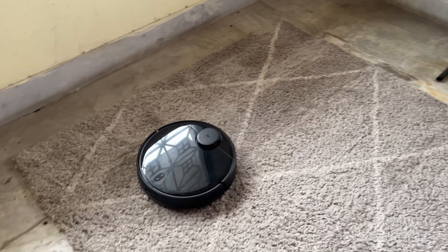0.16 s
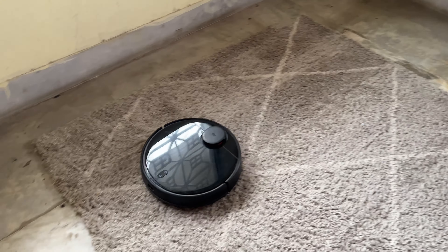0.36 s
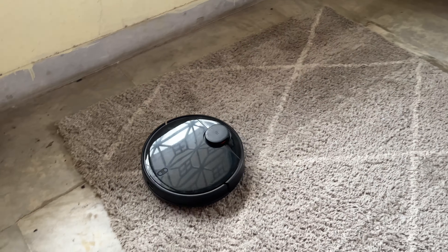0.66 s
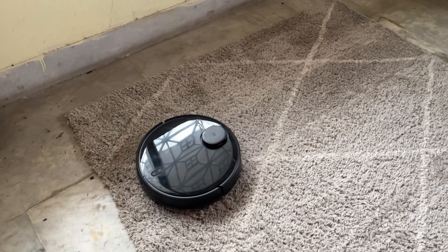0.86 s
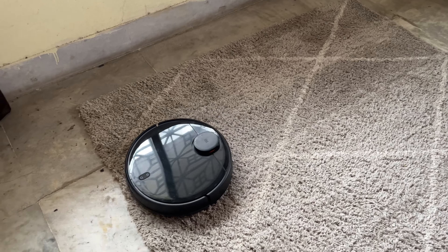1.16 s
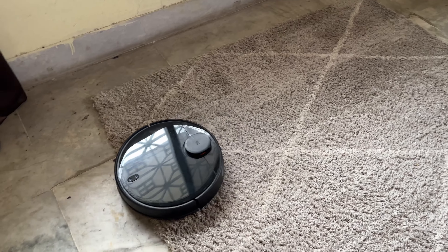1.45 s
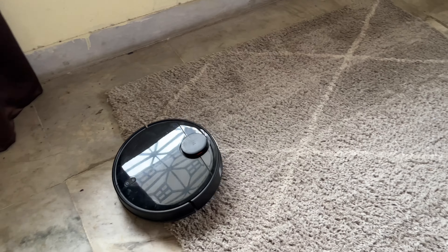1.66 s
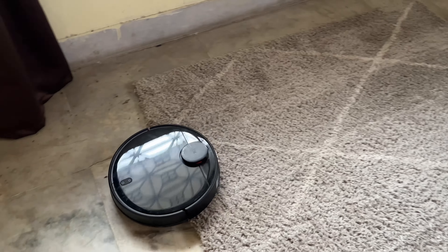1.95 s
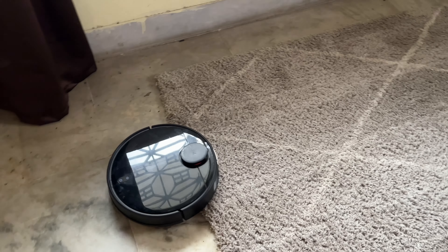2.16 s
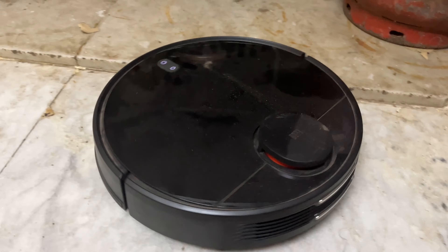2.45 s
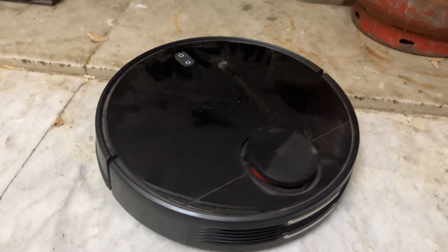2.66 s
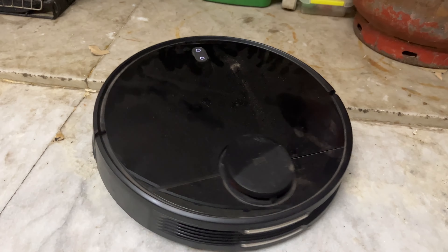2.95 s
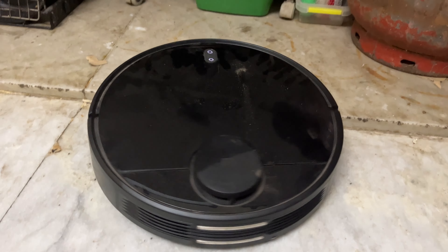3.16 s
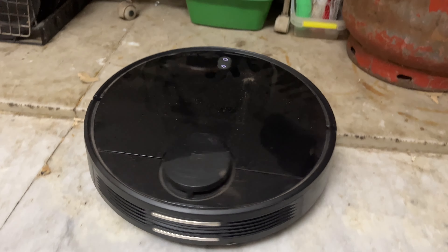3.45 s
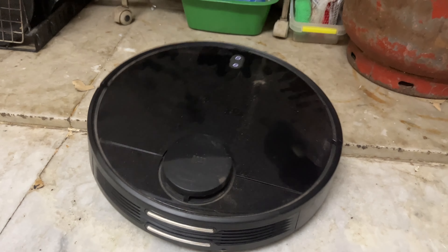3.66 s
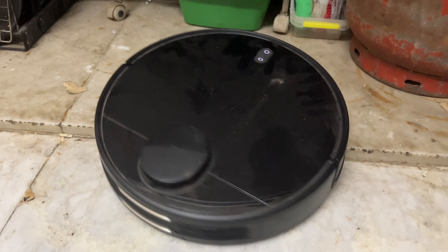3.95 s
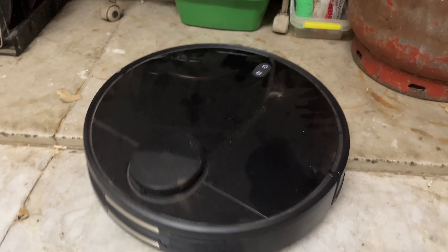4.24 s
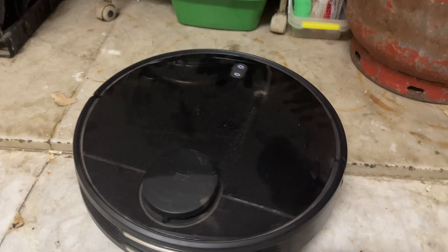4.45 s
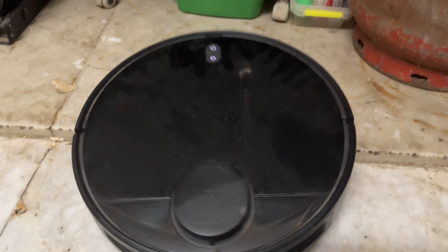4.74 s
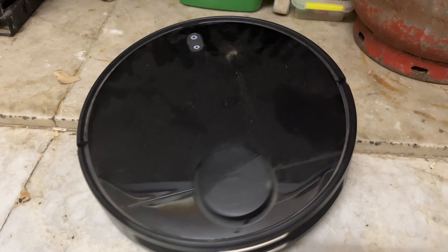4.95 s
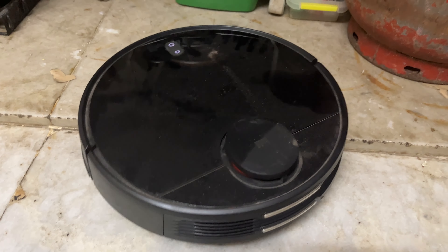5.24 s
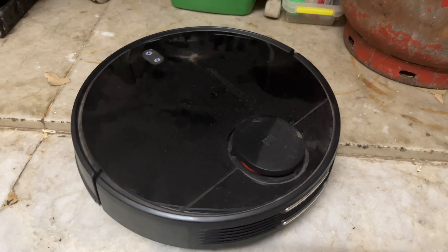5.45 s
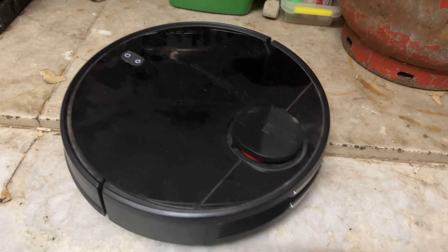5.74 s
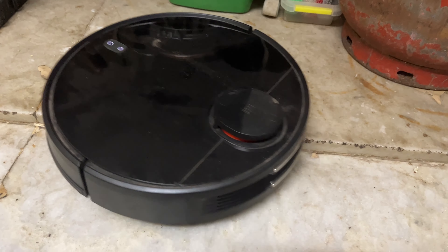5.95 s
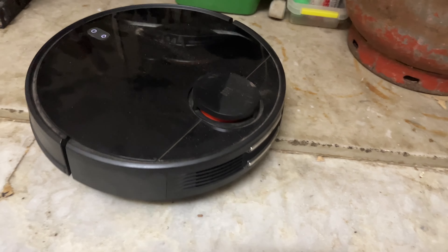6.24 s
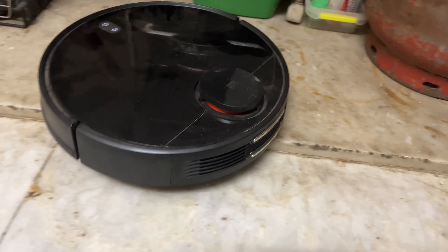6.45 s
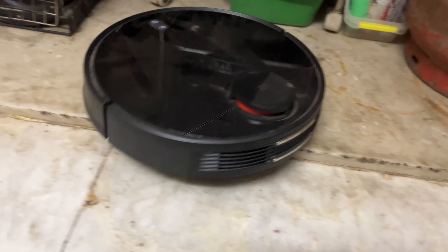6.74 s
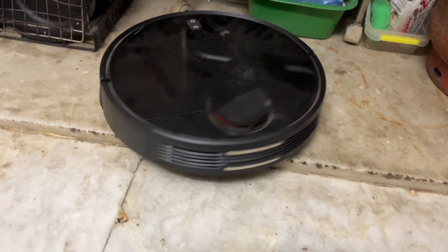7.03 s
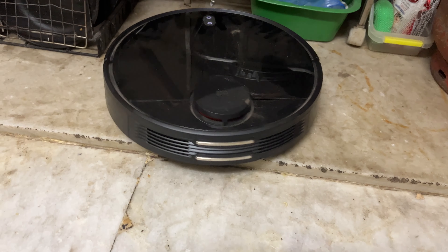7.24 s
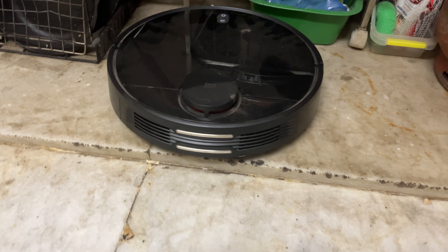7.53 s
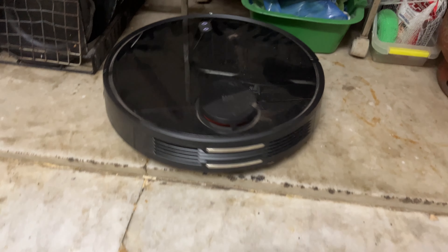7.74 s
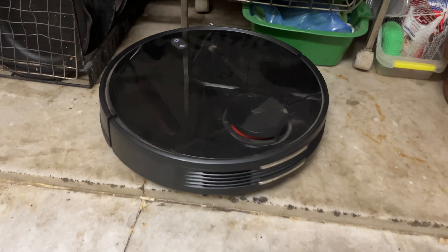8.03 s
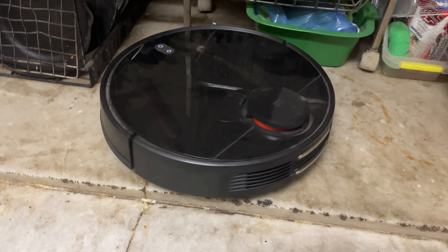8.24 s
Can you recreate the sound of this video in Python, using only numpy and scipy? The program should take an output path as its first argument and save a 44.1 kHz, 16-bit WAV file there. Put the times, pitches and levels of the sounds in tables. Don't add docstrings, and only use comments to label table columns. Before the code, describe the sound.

From 0 to 2.4 seconds a robot vacuum runs on carpet some distance away: steady rushing air, a low fan hum near 210 Hz and a nasal gear whine around 1 kHz that sags and breaks repeatedly as tufts catch the wheels. Faint shell clicks come near 1.6 to 1.9 and 2.3. At 2.4 the view cuts abruptly to the machine close by on tile: louder, hissier air, a thin very high whine and motor tones that swell and fade, strongest around 4.3. Hollow plastic knocks hit at 2.8 and 3.3, a sharp hard clatter at 3.95 to 4.1, then clacks at 4.75 and 5.1, with brief rattles, dull scuffs and short room echo. It runs mostly steadily until another cluster at 6.7 to 7.1. From about 7.4 to the end at 8.4, deep floor booms swell under the slightly softer motor and air.

```python
import sys
import numpy as np
from scipy import signal
from scipy.fft import rfft, irfft, next_fast_len
from scipy.io import wavfile
from scipy.ndimage import uniform_filter1d

SR = 44100
rng = np.random.default_rng(int(sys.argv[2]) if len(sys.argv) > 2 else 0)


def dump_mix(stems):
    frames = np.atleast_2d(stems).T
    limited = np.clip(frames, -1, 1)
    pcm = np.round(limited * 32767).astype(np.int16)
    wavfile.write(sys.argv[1], SR, pcm)


def boost_factor(decibels):
    exponent = np.asarray(decibels, float) / 20
    return 10 ** exponent


N = 369116
T = np.arange(N) / SR
T_SLOW = T[::64]
CUT_S = 2.402


def evened(x):
    return x / np.sqrt(np.mean(x ** 2) + 1e-20)


def read(points, hz):
    f, value = np.transpose(points)
    return np.interp(np.log(hz + 1), np.log(f + 1), value)


def curves(rows, t=T):
    s, *columns = np.transpose(rows)
    return [np.interp(t, s, c) for c in columns]


def drift(top_hz):
    slow = 0
    for f in np.geomspace(top_hz / 20, top_hz, num=16):
        slow = slow + np.sin(2 * np.pi * (f * T_SLOW + rng.random())) / np.sqrt(f)
    return np.interp(T, T_SLOW, evened(slow))


def tone(hz, db):
    return np.sqrt(2) * boost_factor(db) * np.exp(2j * np.pi * (np.cumsum(hz) / SR + rng.random()))


def left_right(mid, side):
    return np.array([mid + side, mid - side]).real


def summed(rest_db, shapes, dbs):
    power = boost_factor(rest_db) ** 2
    for shape, db in zip(shapes, dbs):
        power = power + (boost_factor(db) * shape) ** 2
    return 10 * np.log10(power)


# f/Hz, density/(dB per Hz)
FAR_MID = [(24, -53), (40, -16), (211, -1.5), (263, -8.5), (432, -9.5), (746, -18), (1030, -15),
           (1570, -26.5), (2390, -22), (6620, -30.5), (7310, -32), (8070, -55.5), (9840, -44), (13300, -45),
           (15000, -55)]
FAR_SIDE = [(24, -50), (40, -35), (211, -5), (888, -8.5), (1030, 1), (1170, -15), (1740, -20),
            (2340, -14.5), (7320, -21), (9850, -32), (11400, -63), (12600, -37), (15000, -34)]
NEAR_MID = [(30, -56), (45, 0.5), (160, -4.5), (950, -10.5), (1390, -13.5), (1570, -17.5), (2300, -16),
            (3830, -19), (7200, -24.5), (8300, -46), (9200, -36.5), (10000, -31), (12700, -32),
            (13400, -33), (14800, -48)]
NEAR_SIDE = [(30, -36), (86, -6), (157, -15), (338, -15.5), (693, -8.5), (1420, -11.5), (1870, -16.5),
             (8280, -20.5), (10300, -31), (10900, -27), (11700, -65), (13300, -36), (15600, -24)]
# f/Hz, width/Hz, level/dB
DUCT = [(300, 15, 5), (357, 38, 5), (419.4, 43, 7), (494, 23, 6.5), (1050, 310, 5), (2347, 300, 4),
        (2440, 170, 1), (3300, 170, 3), (3840, 730, 4)]
# t/s, loudness/dB, exhaust facing/0-1
POSE = [(0, -1.5, 0.4), (.74, 0, 0.46), (1.54, -1, 0.61), (1.88, 2, 0.48), (2.39, 1, 0.77),
        (2.41, 0.5, 0.1), (2.61, 1, 0.16), (2.96, 0.5, 0.32), (3.5, 1.5, 0), (3.75, -1, 0.42),
        (4.2, -0.5, 0.81), (4.95, 0, 0.6), (5.4, -1, 0.33), (6.31, 0, 0.52), (6.91, 0, 0.11), (7.45, -2, 1),
        (8.37, -2.5, 0.19)]
# far level/dB, near level/dB, share of loudness/1, gain when exhaust faces phone/dB
LAYERS = [
    (-47, -41, 0.99, -1),
    (-59.5, -50, 0.56, 5),
    (-59.5, -49.5, 1, 6),
    (-73.5, -62, 0.19, 5),
]
# t/s, length/s, level/dB
GRIT = [
    (3.476, 0.24, 4.5),
    (7.445, 0.3, 0),
]


def air_levels(hz, t):
    duct_db = sum(db / (1 + (2 * (hz - f) / w) ** 2) for f, w, db in DUCT)
    loud_db, facing = curves(POSE, t)
    far_db, near_db, share, faced_db = np.transpose(LAYERS)[:, :, None]
    swell_db = sum(db * np.exp(-((t - s) / length) ** 2) for s, length, db in GRIT)
    grit_db = np.outer(np.arange(len(LAYERS)) == 2, swell_db)
    edges_hz = np.array([[250, 1300], [1500, 2700], [2900, 7000], [9600, 14000]])
    place = np.interp(np.log(hz + 1), np.log(edges_hz.ravel()), [0, 0, 1, 1, 2, 2, 3, 3])
    weights = np.maximum(1 - abs(place[:, None] - np.arange(len(edges_hz))), 0)
    views = [(far_db, FAR_MID, FAR_SIDE, -10.5, t < CUT_S),
             (near_db, NEAR_MID, NEAR_SIDE, -4, t >= CUT_S)]
    out = 0
    for base_db, mid, side, side_db, on in views:
        mid_db = read(mid, hz) + duct_db
        both_db = np.array([mid_db, read(side, hz) + duct_db + side_db])[:, :, None]
        band_power = [np.sum(boost_factor(mid_db[(hz > lo) & (hz < hi)]) ** 2) for lo, hi in edges_hz]
        band_db = 10 * np.log10(band_power)
        layer_db = base_db + share * loud_db + faced_db * facing + grit_db - band_db[:, None]
        out = out + on * boost_factor(weights @ layer_db + both_db)
    return out


# f/Hz, share of sum in difference/1
LEAN = [(100, .05), (400, 0.09), (700, 0.34), (1400, 0.25), (2000, 0.063), (2800, .15), (5000, 0.41),
        (6800, .06), (9000, 0.01)]


def air(patchy_db=1.24, whistle_db=3.0):
    frames, hz = N // 256 + 5, np.fft.rfftfreq(1024, 1 / SR)
    t = np.arange(frames) * 256 / SR
    a, b, c, d, patches, whistles = rng.standard_normal((frames, 513, 6)).T
    patches = uniform_filter1d(patches, size=8, axis=0)
    patches = evened(uniform_filter1d(patches, size=12, axis=1))
    whistles = evened(uniform_filter1d(whistles, size=70, axis=1))
    lean = np.clip(read(LEAN, hz), -1, 1)[:, None]
    total = a + 1j * b
    z = np.array([total, lean * total + np.sqrt(1 - lean ** 2) * (c + 1j * d)])
    patch_depth_db = patchy_db * (1 + 2.0 * (hz > 12900)[:, None])
    z *= air_levels(hz, t) * boost_factor(patch_depth_db * patches + whistle_db * whistles + 0.5)
    return left_right(*signal.istft(z, nperseg=1024, noverlap=768)[1][:, :N])


# t/s, f/Hz, level/dB
FAN = [(0, 209.6, -50), (1.5, 214, -46.5), (2.39, 211.9, -49), (2.41, 213.5, -45.5), (4, 211, -48.5),
       (6, 212.5, -48), (8.37, 211.6, -53.5)]
# t/s, f/Hz, level/dB
FAN_TOP = [(0, 13570, -83), (2.39, 13570, -83), (2.41, 13690, -67), (3.7, 13695, -67), (4.1, 13645, -67),
           (8.37, 13665, -66)]


def fan():
    hz, db = curves(FAN)
    shaft = tone(hz + 1.88 * drift(12), db + 0.5 * drift(22.8))
    hz, db = curves(FAN_TOP)
    blades = tone(hz + 9 * drift(8), db + 3.0 * drift(12))
    return left_right(shaft + blades, 0.021 * shaft + .6j * blades)


# multiple/1, middle t/s, length/s, level/dB
BEAMS = [(4, 1.7, 4.1, -58), (4, 2.67, 0.42, -57), (4, 3.43, 0.49, -50.5), (4, 4.4, 0.81, -47),
         (4, 5.78, 0.73, -54), (4, 8.1, 0.82, -58), (4, 7.6, 0.82, -78.5), (6, 1.23, .4, -65),
         (6, 3.4, 0.74, -50), (6, 5, 1.5, -54), (6, 6.19, 0.52, -55), (6, 7.06, 0.98, -52),
         (9, 2.9, 6.9, -62.5), (9, 3.6, 0.39, -53), (9, 4.65, 0.33, -56), (9, 6.16, 0.42, -52),
         (9, 6.93, 0.11, -51), (9, 8.0, 0.38, -56), (18, 1.9, .6, -74), (18, 2.995, 0.75, -56.5),
         (18, 3.52, 0.4, -55.5), (18, 4.35, .6, -64), (18, 5.2, 0.44, -61), (18, 5.9, .4, -62),
         (18, 7.35, 1.26, -55), (2.5, 4.4, .8, -55), (2.5, 5.84, 0.87, -53.5)]


def beam(order):
    rows = [row for row in BEAMS if row[0] == order]
    shapes = [np.exp(-4 * ((T_SLOW - s) / length) ** 2) for _, s, length, _ in rows]
    off_beam_db = -70.5
    return np.interp(T, T_SLOW, summed(off_beam_db, shapes, [db for *_, db in rows]))


# t/s, commutator f/Hz, second-order level/dB
BRUSH = [(0, 716, -80), (.9, 716, -72.5), (1.9, 716.5, -56.5), (2.39, 716.5, -54.5), (2.41, 702, -60.5),
         (3.2, 700, -50.5), (3.9, 699.5, -55.5), (4.1, 704, -47.5), (4.3, 705.5, -40), (4.66, 706, -50.5),
         (5.1, 706.5, -63), (5.6, 706, -51.5), (6.2, 704.5, -55), (6.75, 701.5, -47.5), (7.05, 698, -50),
         (7.25, 703.5, -61), (7.65, 704.5, -47), (8.37, 702, -59.5)]
# multiple/1, far sum/dB, far difference/dB, near sum/dB, near difference/dB
ORDERS_DB = [(.5, -64, -75, -58, -68), (2.5, -80, -80, -64, -67), (10, -72, -71, -80, -76),
             (15, -90, -95, -76, -90), (17, -92, -95, -75, -95), (20, -83, -83, -71, -74)]
# multiple/1, difference against sum/dB
STRONG_SIDE = [(4, -3.5), (6, -12), (9, -4), (18, -7), (2.5, -18)]


def brush():
    far = T < CUT_S
    hz, db = curves(BRUSH)
    hz = hz * (1 + 0.000583 * drift(8))
    mid = tone(2 * hz, db + 0.7 * drift(15))
    side = tone(2 * hz, np.where(far, -62., -48.) + 4.5 * drift(6))
    for k, far_db, far_side_db, near_db, near_side_db in ORDERS_DB:
        mid = mid + tone(k * hz, np.where(far, far_db, near_db) + 3.0 * drift(10))
        side = side + tone(k * hz, np.where(far, far_side_db, near_side_db) + 6.7 * drift(5))
    for k, side_db in STRONG_SIDE:
        db = beam(k)
        mid = mid + tone(k * hz + 6 * drift(40), db - 3.0 + 2.2 * drift(70))
        side = side + tone(k * hz, db - 5.0 + side_db + 2.6 * drift(5))
    return left_right(mid, side)


# t/s, f/Hz, level/dB
GEARS = [(0, 1055, -52), (.12, 1070, -40.5), (.3, 1068, -48), (.7, 1059, -45.5), (1.1, 1039, -49.5),
         (1.43, 985, -51), (1.78, 1023, -50.5), (2.1, 1004, -54), (2.39, 901, -55.5)]
# t/s, speed lost/Hz, whine lost/dB, slip/s
SNAGS = [(.13, 11, 13, 0.035), (.205, 62, 16, 0.017), (.26, 1, 12, 0.0091), (.385, 20.5, 8, 0.03),
         (0.411, 39, 7, 0.022), (.455, 1.5, 10, 0.013), (.59, 0.5, 2, 0.0088), (.76, 1, 8, 0.032),
         (.79, 0, 16, 0.0083), (.915, 19.5, 7, 0.018), (1.015, -0.5, 7, 0.014), (1.135, 30, 7, 0.011),
         (1.175, -0.5, 0, 0.0089), (1.33, 1.5, 11, 0.052), (1.49, -0.5, 14, 0.015), (1.54, 1.5, 16, 0.021),
         (1.61, 1.5, 14, 0.032), (1.68, 0, 13, .012), (1.722, -1, 15, .012), (1.82, 3, 14, 0.015),
         (1.92, 2, 22, 0.075), (2.0, 40, 2, .01), (2.05, 2, 12, 0.018), (2.19, -1, 10, 0.027),
         (2.335, -7, 13.5, 0.013)]


def wheels():
    snag_s, regain_s = .025, .07
    hz, db = curves(GEARS, T_SLOW)
    s, sag_hz, lost_db, slip_s = np.transpose(SNAGS)
    since = T_SLOW[:, None] - s
    caught = np.clip(since / snag_s + 1, 0, 1)
    slowed = caught * np.exp(-(np.maximum(since, 0) / regain_s) ** 2)
    hz = hz - slowed @ sag_hz
    db = db - np.exp(-(since / slip_s) ** 2) @ lost_db
    return np.interp(T, T_SLOW, hz), np.interp(T, T_SLOW, db)


def gears():
    hz, db = wheels()
    whine = tone(hz + 3 * drift(150), db + 2.6 * drift(300)) * (T < CUT_S)
    return left_right(whine, (0.047 + .45j) * whine)


# start t/s, length/s, room mode level/dB, rumble level/dB, rumble f/Hz
SWELLS = [(0.221, 0.057, -60, -60, 104.6), (1.6, 0.091, -57, -67, 90), (1.917, 0.36, -51.5, -57.5, 84.6),
          (2.447, 0.35, -60, -49.5, 80.3), (2.807, 0.041, -51, -59, 87.6), (3.055, 0.33, -54, -45.5, 92.7),
          (3.503, 0.33, -60, -51.5, 107.2), (4.032, 0.16, -46, -41.5, 81.03), (4.345, .05, -60, -62, 79.6),
          (4.555, 0.096, -60, -44.5, 92.8), (4.733, 0.18, -44, -41.5, 96), (5.11, 0.031, -49, -53, 148.5),
          (5.223, 0.508, -49, -46.5, 94.6), (5.814, 0.24, -55, -66, 97.2), (6.324, 0.11, -47.5, -60, 99.8),
          (6.724, 0.42, -49, -48, 97.3), (7.462, 0.27, -32.5, -41, 90.6), (7.871, 0.075, -36, -40, 91.2),
          (8.122, 0.17, -33, -44, 97)]


def swells():
    edge_s = 0.065
    shapes = []
    for start, hold, *_ in SWELLS:
        outside = np.maximum(np.maximum(start - T_SLOW, T_SLOW - start - hold), 0)
        shapes.append(np.exp(-(outside / edge_s) ** 2))
    s, length, mode_db, rumble_db, hz = np.transpose(SWELLS)
    mode_db = np.interp(T, T_SLOW, summed(-75, shapes, mode_db))
    rumble_db = np.interp(T, T_SLOW, summed(-61.5, shapes, rumble_db))
    return mode_db, rumble_db, np.interp(T, s + length / 2, hz)


def boom(width_hz=16):
    mode_db, rumble_db, hz = swells()
    a, b = rng.standard_normal((2, 2, len(T_SLOW)))
    low = signal.butter(2, width_hz / 2, fs=1 / T_SLOW[1], output="sos")
    wobble = signal.sosfilt(low, a + 1j * b)
    wobble = wobble / (np.sqrt(uniform_filter1d(abs(wobble) ** 2, size=60)) + 1e-9)
    rumble = [tone(hz, rumble_db) * np.interp(T, T_SLOW, port) for port in wobble]
    mode = tone(51.7 + .5 * drift(6), mode_db + drift(12))
    return left_right(mode + rumble[0], 0.062 * mode + 0.26 * rumble[1])


def spread(events, sound):
    places = np.zeros((4, N))
    for k, (s, *settings) in enumerate(events):
        places[k % len(places), round(s * SR):][:4000] += sound(*settings)
    return places


# ratio to struck mode/1, level/dB
SHELL = [(1.001, 5), (1.27, -30), (1.9, -35)]


def knock(clack_db, clack_hz, thud_db, thud_hz, crack_db):
    t = np.arange(4000) / SR
    chance = rng.standard_normal((4, 4000))
    bursts = boost_factor(3.2 * evened(uniform_filter1d(chance[3], size=110)))
    soft = np.clip(boost_factor(-.4 * (thud_db + 27)), 1, 4)
    # noise, f/Hz, level/dB, t60/s, rise/s, ring/dB
    parts = [(chance[0], clack_hz, clack_db - 6.5, .05, .0025, -4),
             (chance[1], thud_hz, thud_db + 4, .085, .004, -2)]
    out = 0
    for noise, hz, db, t60, rise, ring_db in parts:
        band = signal.butter(2, [hz / 1.5, hz * 1.45], "bandpass", fs=SR, output="sos")
        clatter = evened(signal.sosfilt(band, noise * bursts))
        ring = sum(boost_factor(d - 20 * r * t / t60) * np.sin(2 * np.pi * hz * r * t) for r, d in SHELL)
        envelope = boost_factor(-60 * t / t60) * (1 - np.exp(-t / rise / soft))
        part = (clatter + boost_factor(ring_db - 1.0) * ring) * envelope
        out = out + boost_factor(db) * part / abs(part).max()
    high = signal.butter(2, [2600, 12500], "bandpass", fs=SR, output="sos")
    decay = boost_factor(-60 * t / 0.051) + 0.072 * boost_factor(-60 * t / 0.66)
    crack = signal.sosfilt(high, chance[2] * bursts) * decay
    return out + boost_factor(crack_db + 0.5) * crack * (1 - np.exp(-t / 0.0012))


# t/s, clack level/dB, thud level/dB, thud f/Hz
ROCKS = [(1.5582, -35, -42, 419), (1.8582, -27.5, -40, 280), (2.285, -30, -38, 915),
         (2.4889, -30, -35, 400), (2.7864, -12.5, -31, 273), (2.8348, -25, -33.5, 419),
         (2.8652, -52, -36, 467), (3.309, -22, -48, 357), (3.9894, -43, -36, 645), (4.016, -12, -24, 417),
         (4.029, -13, -26, 455), (4.0593, -18, -24.5, 538), (4.0862, -13, -33, 310),
         (4.5579, -40, -35, 990), (4.5995, -40, -35, 600), (4.7609, -28, -26.5, 311.4),
         (4.867, -42.5, -32, 478), (5.1218, -10, -27, 1126), (5.1352, -34, -31, 606),
         (5.172, -34, -29.5, 506), (6.629, -30, -53, 296), (6.735, -34, -38, 465),
         (6.8481, -23, -30.5, 1000), (6.8906, -22.5, -36, 363), (7.0639, -29, -34, 403),
         (7.107, -24, -41, 493), (7.2077, -50, -35, 734)]
# t/s, clack level/dB, clack f/Hz, thud level/dB, crack level/dB
BLOWS = [(1.8084, -34.5, 2960, -43, -53), (1.8797, -31, 2810, -42, -49), (1.9044, -28, 1480, -39, -46),
         (2.4404, -20.5, 1840, -44, -40), (2.8116, -10.5, 800, -33, -54), (2.9178, -23.5, 1235, -31, -46),
         (3.2816, -20.5, 1770, -26, -40), (3.938, -11, 2570, -35, -15), (3.957, -10, 1453, -26.5, -30),
         (4.7533, -11, 3170, -23, -26.5), (4.7624, -8.5, 1091, -33, -45), (4.8, -21, 1740, -42, -39),
         (5.0625, -10, 1760, -29.5, -40), (5.0808, -22, 2210, -29.5, -38), (6.684, -17, 1290, -27.5, -48),
         (7.0196, -13.5, 1867, -33, -42), (7.0415, -15.5, 2100, -35, -42)]


def knocks():
    rock_clack_hz, rock_crack_db, blow_thud_hz = 1315, -23, 488
    events = []
    for s, clack_db, thud_db, thud_hz in ROCKS:
        events.append((s, clack_db, rock_clack_hz, thud_db, thud_hz, thud_db + rock_crack_db))
    for s, clack_db, clack_hz, thud_db, crack_db in BLOWS:
        events.append((s, clack_db, clack_hz, thud_db, blow_thud_hz, crack_db))
    return spread(sorted(events), knock)


def tap(db, hz, t60):
    t = np.arange(4000) / SR
    ring = np.sin(2 * np.pi * hz * t) + 0.44 * np.sin(2 * np.pi * hz * 1.13 * t)
    return boost_factor(db - 60 * t / t60) * ring * (1 - np.exp(-t / 0.00077))


# t/s, peak level/dB, f/Hz, t60/s
TAPS = [(1.812, -46, 4730, .06), (1.815, -47, 3500, .06), (1.9, -43, 3300, .05), (1.905, -35, 523, 0.052),
        (1.863, -41, 803, .05), (2.783, -28, 1700, 0.036), (2.7915, -30, 1330, .03),
        (2.789, -36, 2870, 0.034), (2.815, -22, 776, 0.034), (2.891, -27, 990, .03),
        (3.282, -30, 3600, .02), (3.284, -41, 5260, 0.053), (3.283, -20.5, 827, 0.049),
        (3.31, -35, 700, 0.034), (4.0165, -12, 1328, 0.06), (1.92, -39, 377, 0.074),
        (2.287, -39, 2020, .04), (3.935, -13.5, 1850, 0.031), (3.9385, -13, 6000, 0.011),
        (3.939, -18, 8100, 0.021), (3.941, -23, 3300, 0.024), (3.955, -23, 3170, 0.056),
        (4.0165, -21, 3070, .03), (4.018, -30, 4970, .04), (4.087, -27.5, 1404, 0.13),
        (4.753, -17.5, 3310, 0.028), (4.7535, -20, 7500, 0.018), (4.755, -21, 2044, 0.042),
        (4.7595, -20, 670, .035), (4.761, -18, 300, 0.066), (5.0625, -21, 1812, 0.044),
        (5.064, -26, 505, 0.04), (5.0795, -30, 6600, .02), (5.082, -29, 3470, .03),
        (5.122, -22, 2850, 0.025), (5.125, -19, 1305, 0.053), (3.9385, -18, 10950, 0.016),
        (5.1735, -31, 2600, .04), (6.399, -32, 1760, .05), (6.6915, -20.5, 763, 0.04),
        (6.702, -33, 2150, 0.067), (6.735, -27, 620, .025), (6.849, -34, 2770, 0.037),
        (6.852, -29, 1050, .04), (7.021, -15.5, 1883, 0.03), (7.0235, -17.5, 1050, 0.025),
        (7.047, -25, 610, 0.038), (7.061, -32, 4150, .04), (7.066, -26.5, 480, 0.044),
        (4.03, -25, 1403, 0.069),
        (2.816, -25, 416, 0.13), (2.858, -26, 450, .05), (2.914, -26.5, 378, 0.046),
          (3.9405, -22, 4960, 0.013), (3.9545, -18, 805, .04), (3.9635, -22, 640, .04),
          (3.986, -28, 800, .04), (4.022, -18, 600, 0.032), (4.037, -23, 422, 0.048),
          (4.043, -27, 2376, 0.078), (4.074, -32, 330, 0.049), (5.131, -28, 201, 0.1),
          (5.132, -26, 432, 0.073), (7.026, -23.5, 596, 0.043), (6.696, -23, 517, 0.053),
          (3.294, -24, 452, .05), (7.107, -31, 500, .03)]


def clicks():
    return spread(TAPS, tap)


def chatter(rows, band_hz, grain_db):
    chance = rng.standard_normal((2, N))
    noise = chance[0] * boost_factor(grain_db * evened(uniform_filter1d(chance[1], size=90)))
    band = signal.butter(2, band_hz, "bandpass", fs=SR, output="sos")
    noise = evened(signal.sosfilt(band, noise))
    out = np.zeros(N)
    for s, length, db in rows:
        near = slice(round((s - .2) * SR), round((s + .2) * SR))
        out[near] += boost_factor(db) * np.exp(-((T[near] - s) / length) ** 2)
    return out * noise


# middle t/s, length/s, level/dB
RATTLES = [(1.83, 0.027, -49.5), (1.917, 0.034, -51), (2.432, 0.036, -48), (2.82, 0.013, -45),
           (2.854, 0.063, -47), (3.296, 0.037, -44), (3.95, .008, -41), (4.03, 0.024, -38),
           (4.042, 0.0046, -40), (4.068, .015, -40), (4.806, 0.024, -42), (5.085, 0.017, -38),
           (5.179, 0.027, -47), (6.676, .015, -48), (6.708, .025, -42), (6.892, .025, -49),
           (7.027, .004, -38), (7.043, .012, -41), (7.066, 0.0091, -47)]
RATTLE_HZ = [1700, 6300]


def rattles():
    return chatter(RATTLES, RATTLE_HZ, 4.0)


# middle t/s, length/s, level/dB
SCUFFS = [(1.915, .025, -46), (2.45, 0.038, -42), (2.5, .04, -45), (2.85, 0.061, -38.5), (4.05, 0.046, -34),
          (4.575, 0.03, -39), (4.62, .02, -42), (4.8, 0.035, -43), (4.88, 0.023, -39), (5.1, 0.033, -36),
          (5.16, 0.044, -44), (6.72, .025, -39), (6.9, 0.035, -42)]
SCUFF_HZ = [280, 1560]


def scuffs():
    return chatter(SCUFFS, SCUFF_HZ, 2.5)


# f/Hz, t60/s
ROOM = [(200, 0.36), (800, 0.29), (2500, 0.29), (6000, 0.36), (12000, 0.035)]
# f/Hz, share/1
ROOM_SHARE = [(200, .99), (600, .7), (1100, .35), (3000, .35), (6500, .9), (8000, .998)]


def room(x):
    taps = np.zeros((2, SR // 2))
    grid = np.arange(200, SR // 2 - 20, 20)
    at = grid + rng.integers(0, 20, (2, len(grid)))
    np.put_along_axis(taps, at, rng.choice([-1., 1.], at.shape), 1)
    hz, t, z = signal.stft(taps, SR, nperseg=256)
    share = np.clip(read(ROOM_SHARE, hz), 0, 1)[:, None]
    z[1] = share * z[0] + np.sqrt(1 - share ** 2) * z[1]
    decay = boost_factor(-60 * t / read(ROOM, hz)[:, None])
    tail = signal.istft(z * decay, SR, nperseg=256)[1]
    return signal.fftconvolve(x[None], tail / np.linalg.norm(tail[0]), axes=1)[:, :N]


# f/Hz, phase/rad
PORTS = [(0, 0), (250, .2), (600, .6), (1120, 1.4), (1500, 1.7), (1900, 1.3), (2840, 1.4), (4500, .8),
         (6500, -1.2), (8400, -3.14), (11700, -6.28), (15000, -9.4)]


def ports(x):
    size = next_fast_len(N)
    gap = read(PORTS, np.fft.rfftfreq(size, 1 / SR)) / 2
    both = irfft(rfft(x, size) * np.exp(1j * np.array([gap, -gap])), size)[:, :N]
    return both * boost_factor(np.array([[.8], [-.8]]))


def scene():
    steady = air() + fan() + brush() + gears() + boom()
    hits, small = knocks(), clicks()
    echoes = sum(room(place) for place in hits + boost_factor(-4.0) * small)
    contacts = (hits + small).sum(0) + rattles() + scuffs()
    return steady + ports(contacts + boost_factor(-5.0) * echoes)


def band_limit(x):
    return signal.sosfilt(signal.butter(12, 15790, fs=SR, output="sos"), x)


def record(dry):
    cut = signal.butter(5, 37, "highpass", fs=SR, output="sos")
    mix = signal.sosfilt(cut, dry)
    return band_limit(mix)


dry = scene()
out = record(dry)
dump_mix(out)
```